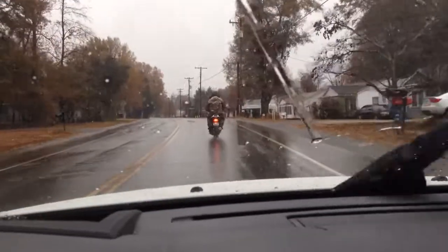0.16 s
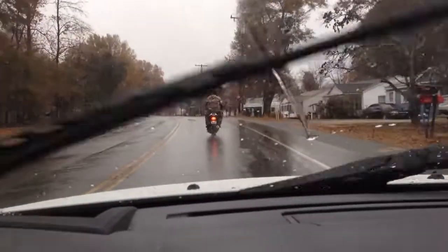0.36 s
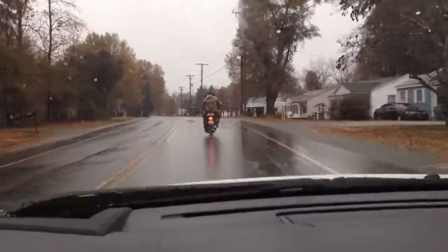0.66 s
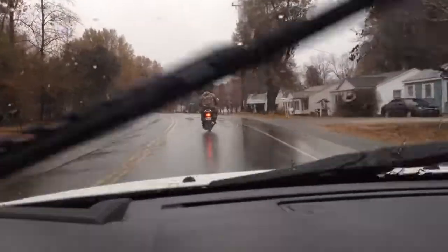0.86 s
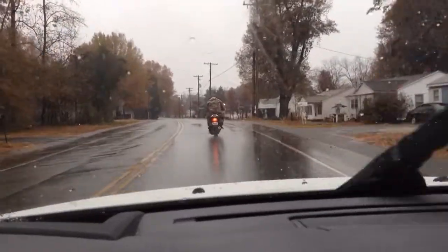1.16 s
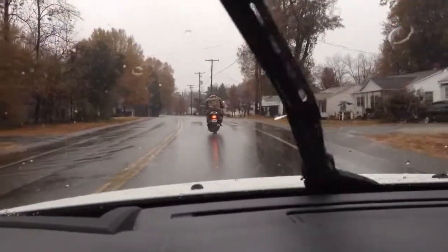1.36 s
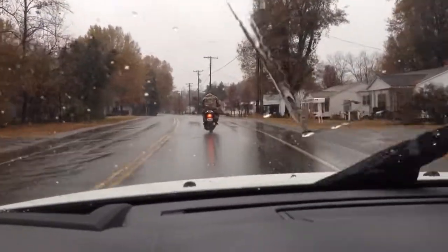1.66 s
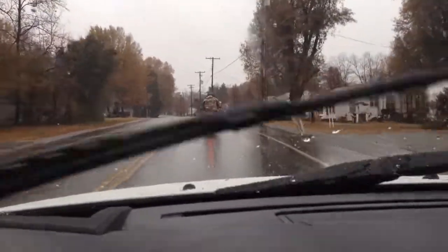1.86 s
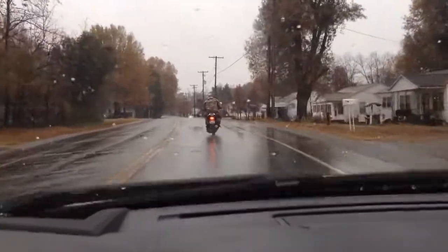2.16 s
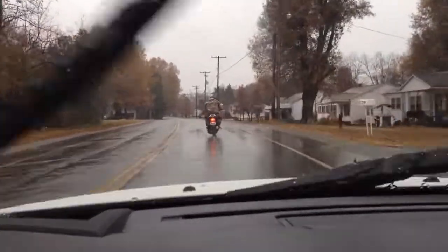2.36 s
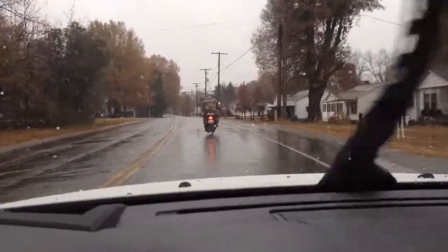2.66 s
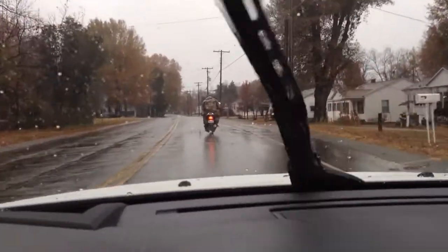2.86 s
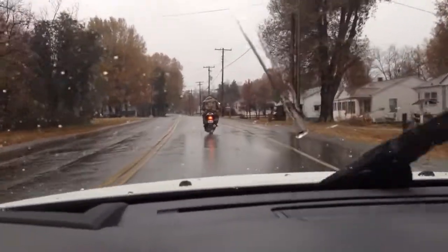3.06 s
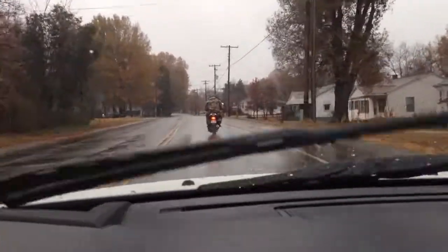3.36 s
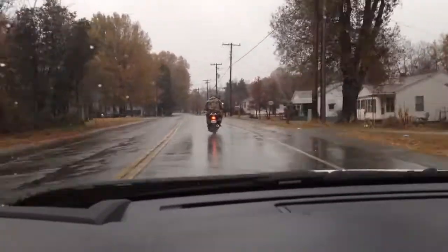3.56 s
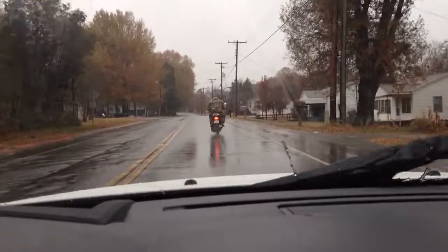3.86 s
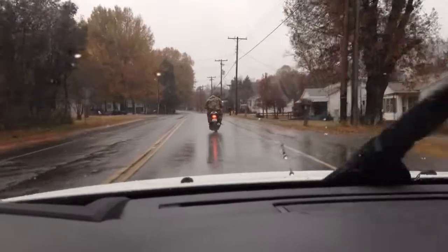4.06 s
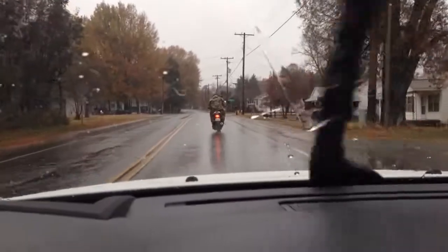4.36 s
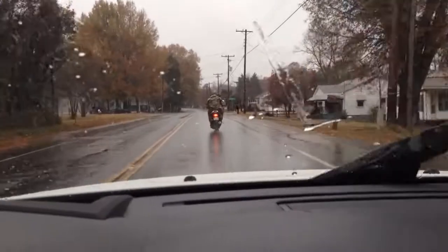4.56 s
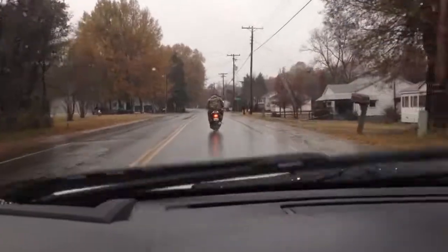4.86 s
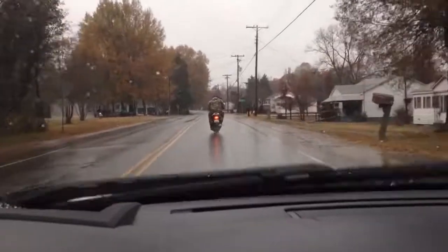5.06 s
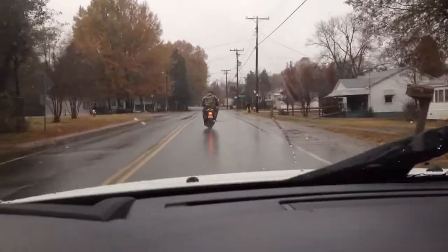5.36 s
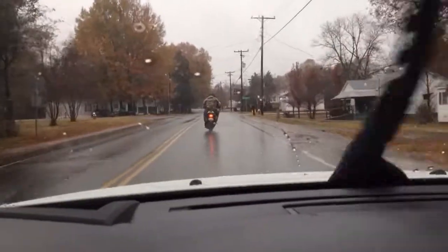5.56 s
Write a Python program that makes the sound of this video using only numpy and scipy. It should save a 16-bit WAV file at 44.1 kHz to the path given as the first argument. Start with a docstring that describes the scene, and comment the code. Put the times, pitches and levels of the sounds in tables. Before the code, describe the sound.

From inside a car in heavy rain: regular dull wiper thuds, softer knocks between, crisp drops splatting, and steady low road boom.

```python
"""Wipers turning on the windshield of a car in heavy rain, heard from behind the dashboard. Each top
turn is a deep thump of ringing body modes and a rubber scuff; softer knocks come around it and at the bottom.
Large drops splat as coloured noise bursts over a fine patter of random drops and a wash of water film.
Beneath lie the boom and rumble of the road, made of filtered noise, and low narrow-band hums."""
import sys
import numpy as np
from scipy import signal
from scipy.fft import rfft, irfft
from scipy.io import wavfile

SR = 44100
rng = np.random.default_rng(int(sys.argv[2]) if len(sys.argv) > 2 else 0)


def waveform_to_disk(signal):
    """Save audio, clipped to [-1, 1], as 16-bit WAV at the path in sys.argv[1]."""
    frames = np.transpose(np.atleast_2d(signal))
    scaled = np.clip(frames, -1, 1) * 32767
    samples = np.round(scaled).astype(np.int16)
    wavfile.write(sys.argv[1], SR, samples)


N = 252243
TIME = np.arange(N) / SR  # seconds

# colour of a drop heard through the glass: frequency_hz, gain_db [relative]
GLASS_COLOUR = [(300, -41), (800, 4), (1500, 3.5), (2100, 1), (3150, 7), (4100, 8), (5500, -0.5),
                (8000, -7), (12000, -16.5), (15500, -22)]


def amp(db):
    """Decibels to gain."""
    return 10 ** (np.asarray(db) / 20)


def unit(x):
    """Scales to rms 1."""
    return x / np.sqrt(np.mean(x ** 2) + 1e-20)


def curve(rows):
    """A table of (time_s, value) at every sample."""
    return np.interp(TIME, *np.transpose(rows))


def add(mix, s, sound):
    """Mixes a sound in at time s; what falls outside the mix is dropped."""
    start = round(s * SR)
    sound = sound[max(-start, 0):]
    part = mix[max(start, 0):][:len(sound)]
    part += sound[:len(part)]


def colour(x, points, size=4096):
    """Minimum-phase filter through (frequency_hz, gain_db) points, so that attacks stay sharp."""
    hz, db = np.transpose(points)
    bins_hz = abs(np.fft.fftfreq(size, 1 / SR))
    gain_db = np.interp(np.log(bins_hz + 1), np.log(hz), db)
    log_gain = np.log(amp(gain_db))
    # the Hilbert transform of the log gain gives the minimum phase
    spectrum = np.exp(np.conj(signal.hilbert(log_gain)))
    taps = np.fft.ifft(spectrum).real[:size // 2]
    return signal.fftconvolve(x, taps)[:len(x)]


def wander(top_hz, count=24):
    """Slow random drift of rms 1: sines with rates over the two octaves below top_hz."""
    t = TIME[::64]  # a coarse grid is enough for slow motion
    rates = np.geomspace(top_hz / 4, top_hz, count)
    drift = sum(np.sin(2 * np.pi * (hz * t + rng.random())) for hz in rates)
    return np.interp(TIME, t, unit(drift))


def band_noise(hz, half_width_hz):
    """Noise in one narrow resonance, 6 dB down at half_width_hz to either side; it wavers by itself."""
    f = np.fft.rfftfreq(N, 1 / SR)
    spectrum = rfft(rng.standard_normal(N))
    return unit(irfft(spectrum / (1 + ((f - hz) / half_width_hz) ** 2), N))


def road(rumble_db=-37.5, boom_db=-5.0, follow=0.15):
    """The body booms with the road surface; tyres and spray rumble in small lumps, with narrow hums."""
    # tyre rumble and the wash of spray under the car: frequency_hz, density_db [per Hz, relative]
    rumble_colour = [(40, -29), (90, -1), (135, -3), (185, -1), (240, -8.5), (320, -14), (390, -15.5),
                     (470, -20.5), (800, -26.5), (1500, -32.5), (4000, -54)]
    # deep boom of the car body: frequency_hz, density_db [per Hz, relative]
    boom_colour = [(20, -32), (30, -10), (42, -2.5), (60, 3), (88, 1), (110, -7), (160, -23.5), (400, -58)]
    # roughness of the road as the level of the boom it drives: time_s, level_db [before boom_db]
    roughness = [(0.0, -29), (0.12, -38.5), (0.6, -41), (0.68, -35.5), (2.52, -40), (3.04, -32), (3.2, -46),
                 (3.7, -31), (3.84, -46), (4.02, -32.5), (4.22, -40.0), (5.72, -40.5)]
    # narrow resonances of tyres and wiper motor: centre_hz, half_width_hz, level_db
    hum_rows = [(117.6, 9.6, -40.5), (1216, 20, -61.5), (675, 17, -64.5)]
    surface = curve(roughness)
    # small random bumps: rms depth 1.1 dB, fastest rate 11 Hz
    lumps = amp(1.1 * wander(11))
    boom = amp(boom_db + surface) * unit(colour(rng.standard_normal(N), boom_colour, size=16384))
    # the rumble follows the roughness only a little
    rumble_level = rumble_db + follow * (surface - surface.mean())
    rumble = amp(rumble_level) * unit(colour(rng.standard_normal(N), rumble_colour, size=16384))
    hums = sum(amp(db) * band_noise(hz, half_width) for hz, half_width, db in hum_rows)
    return lumps * (boom + rumble) + hums


def cabin(x, wet_db=-6, t60=.05):
    """The small padded cabin smears each splash into a short, diffuse tail (t60 in s)."""
    power = signal.lfilter([1], [1, -amp(-120 / (t60 * SR))], x ** 2)
    tail_colour = [(400, -30), (1500, 0.5), (2100, 0.0), (3200, 5.0), (4200, -3), (6000, -8), (15000, -20.5)]
    tail = colour(np.sqrt(power) * rng.standard_normal(N), tail_colour)
    return x + amp(wet_db) * x.std() * unit(tail)


def drops(per_s, size_db, splash_s, largest=4):
    """A random shower: each drop is a tiny burst of spray that decays with time constant splash_s."""
    # sizes are exponential in dB, capped at largest * size_db
    size = amp(size_db * np.minimum(rng.exponential(1, N), largest))
    hits = size * (rng.random(N) < per_s / SR)
    power = signal.lfilter([1], [1, -np.exp(-2 / (splash_s * SR))], hits ** 2)
    return np.sqrt(power) * rng.standard_normal(N)


def patter(taps_db=-3.5, ticks_db=-15.5, wash_db=-7.5, wash_follow=0.83):
    """Dull taps of middling drops and crisp ticks of tiny ones, over the steadier wash of the water film."""
    # how hard the rain beats on the glass: time_s, level_db [before each layer's own level]
    rain_rows = [(0.0, -47.0), (0.34, -44.5), (0.46, -52.5), (0.54, -45.5), (0.76, -49), (1.46, -42.5),
                 (1.56, -46.5), (1.94, -45), (2.6, -46), (2.76, -47.5), (3.14, -45), (3.22, -48.5),
                 (3.78, -45.5), (4.28, -47), (4.38, -43.5), (4.82, -51), (5.1, -44), (5.72, -48.5)]
    tick_colour = [(1500, -25), (4000, 5.0), (7000, 0.0), (10000, -5.5), (15000, -19.0)]
    wash_colour = [(500, -4.5), (1200, -0.5), (2000, 0.0), (3200, 1.5), (4300, 0), (6000, -6),
                   (9000, -16), (15000, -27.5)]
    taps = colour(drops(per_s=600, size_db=5.5, splash_s=0.0031, largest=3.76), GLASS_COLOUR + [(20000, -25)])
    ticks = colour(drops(per_s=120, size_db=10.0, splash_s=0.00018, largest=3.4), tick_colour)
    wash = colour(rng.standard_normal(N), wash_colour)
    # quick random flurries: rms depth 1.54 dB, fastest rate 14 Hz
    rain = curve(rain_rows) + 1.54 * wander(14)
    film = rain.mean() + wash_follow * (rain - rain.mean())
    falling = amp(rain + taps_db) * unit(taps) + amp(rain + ticks_db) * unit(ticks)
    return falling + amp(film + wash_db) * unit(wash)


def splats(grain_db=3, level_db=0.0, bright_db=16, body_db=13, tint_share=0.94, most_db=12):
    """A large drop strikes, then its rim breaks into droplets for a few milliseconds."""
    # large drops on the glass: start_s, level_db, bright_share_db, body_share_db
    # [shares steer the treble and the sound below 2.2 kHz, after offset, scaling and limits]
    splat_rows = [(0.034, -33, -18, -16), (0.5, -41, -20, -26), (0.518, -35, -10, -26),
                  (0.6175, -31, -14, -12), (1.02, -32.5, -14, -30), (1.065, -37.5, -20, -19),
                  (1.1329, -34, -9, -19), (1.247, -34, -11, -26), (1.8504, -36, 5, -24),
                  (1.8838, -32, -29, -26), (1.9828, -30.5, 8, -8), (2.023, -31.5, -31, -7),
                  (2.079, -32, -24, -16), (2.5471, -34, -9, -8), (2.7493, -34, -14, -17),
                  (3.1079, -37, -16, -11), (3.3985, -34, -9, -18), (3.5537, -31.5, -22, -18),
                  (3.894, -31.5, -30, -29), (4.208, -28.5, -11.5, -30), (4.4498, -31.5, -8, -24),
                  (4.582, -32, -12, -10), (5.2012, -26, 20, -14), (5.572, -37.5, -10, -15)]
    # heavy drops, with more low sound, splash for longer: body_share_db, decay_s [time constant]
    splash_time = [(-16.5, 0.003), (-5, 0.0055)]
    strike_db, strike_s = -5, 0.00064  # level relative to the splash, decay time constant
    out, t = np.zeros(N), np.arange(SR // 20) / SR
    hz, glass_db = np.transpose(GLASS_COLOUR)
    for s, db, bright, body in splat_rows:
        spread_s = np.interp(body, *np.transpose(splash_time))
        envelope = amp(strike_db) * np.exp(-t / strike_s) + np.exp(-t / spread_s)
        grain = amp(grain_db * rng.standard_normal(len(t)))
        burst = rng.standard_normal(len(t)) * grain * envelope
        # small fast drops hiss, big slow ones tap
        hiss = (bright + bright_db) * np.clip(np.log2(hz / 4000), 0, 1)
        tap = (body + body_db) * (hz < 2200)
        tint = np.clip(tint_share * (hiss + tap), -7, most_db)
        drop = colour(burst, np.transpose([hz, glass_db + tint]), size=1024)
        # equal energy for equal level and splash time
        drop = drop / np.linalg.norm(drop) * np.sqrt(spread_s * SR / 2)
        add(out, s, amp(db + level_db) * drop)
    return out


def ring(pitch, rise_cycles, weight):
    """One blow on the windshield: modes of alternating sign, the low ones swelling slowest."""
    # what windshield and cabin ring with: mode_hz [before pitch], level_db [before weight], t60_s
    modes = [(50.3, -9.5, 0.11), (86, -15, 0.19), (109.5, 8.5, 0.057), (157, 7.5, 0.038), (227, 3, 0.027),
             (289.6, -6, 0.083), (319.5, -5.5, 0.08), (382, -2.5, 0.031)]
    t = np.arange(SR // 4) / SR
    out = np.zeros(len(t))
    for k, (hz, db, t60) in enumerate(modes):
        swell = 1 - np.exp(-t * hz / rise_cycles)
        decay = amp(-60 * t / t60)
        tone = np.sin(2 * np.pi * hz * pitch * t)
        out += (-1) ** k * amp(db) * weight(hz) * swell * decay * tone
    return out


def scuff(length_s):
    """A rubber lip flips over on wet glass: a brief swell of dull friction noise."""
    t = np.arange(SR // 8) / SR
    rub_colour = [(200, -28), (450, 5.5), (600, 4), (1000, -0.5), (1500, -8), (4000, -59)]
    rub = colour(rng.standard_normal(len(t)), rub_colour)
    return unit(rub) * 2 * t / length_s * np.exp(-(t / length_s) ** 2)


def wipers(flip_s=0.019, knock_octaves=0.99, mount_hz=450):
    """Each top turn is a quick run of blows with a slap of rubber; the knocks ring a part of the same body."""
    # one row per wiper cycle, timed at the top turn:
    # start_s, level_db, lip_slap_db [relative to level_db], pitch_factor
    turns = [(0.0468, -16, -18.5, 1.03), (1.4955, -14, -21, .99), (2.9442, -13.5, -21, 0.994),
             (4.3915, -14, -21, .99)]
    # contacts within one turn, as the two blades flip and the linkage takes up its play:
    # delay_s, level_db [relative to the turn], corner_hz [of the cushioned blow]
    contacts = [(0.0, 0, 403), (0.0151, 0, 800), (0.0325, -5, 397)]
    # softer knocks of the linkage, as the arms brake before the top turn and each blade turns at the bottom:
    # delay_s [after the top turn], level_db, centre_hz, scuff_db, scuff_s [envelope scale]
    knock_rows = [(-0.114, -34, 260, -45, 0.019), (-0.090, -27, 295, -39.5, .014),
                  (-0.026, -40.5, 333, -55, 0.014), (0.701, -31.5, 210, -49, 0.027),
                  (0.728, -30.5, 170, -49.5, 0.039), (0.795, -35.5, 219, -56, 0.032)]
    blows, rubber = np.zeros((2, N))
    for s, db, lip_db, pitch in turns:
        for delay, contact_db, corner_hz in contacts:
            blow = ring(pitch, rise_cycles=0.46, weight=lambda hz: 1 / np.hypot(1, (hz / corner_hz) ** 2))
            add(blows, s + delay, amp(db + contact_db) * blow)
        add(rubber, s, amp(db + lip_db) * scuff(flip_s))
        for delay, knock_db, centre, scuff_db, scuff_s in knock_rows:
            knock = ring(pitch, rise_cycles=0.55,
                         weight=lambda hz: 2 * np.exp(-(np.log2(hz / centre) / knock_octaves) ** 2))
            add(blows, s + delay, amp(knock_db) * knock)
            add(rubber, s + delay, amp(scuff_db) * scuff(scuff_s))
    # the soft mounts of the linkage let only the low part of each blow into the cabin
    mounts = signal.butter(6, mount_hz, fs=SR, output="sos")
    return signal.sosfilt(mounts, blows) + rubber


def scene():
    """Wipers, rain and road as heard behind the dashboard."""
    large_drops = cabin(splats(), wet_db=-4.0, t60=0.074)
    fine_rain = cabin(patter(), wet_db=-5.5, t60=0.058)
    return (wipers() + large_drops + fine_rain + road())[None]


def record(dry):
    """The microphone's upper band limit: a steep linear-phase low-pass."""
    edge_hz = 15450
    lowpass = signal.firwin(511, edge_hz, window=("kaiser", 9), fs=SR)
    return signal.oaconvolve(dry, lowpass[None], "same")


dry = scene()
out = record(dry)
waveform_to_disk(out)
```